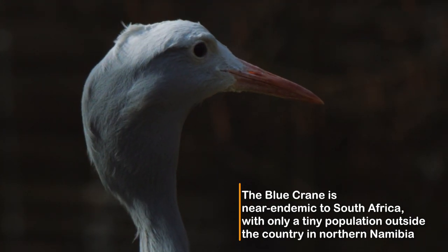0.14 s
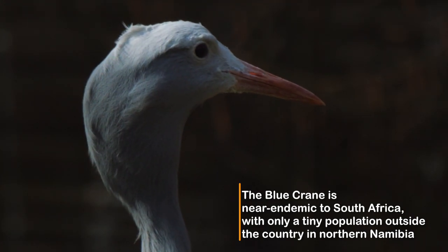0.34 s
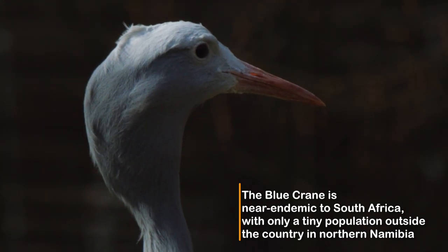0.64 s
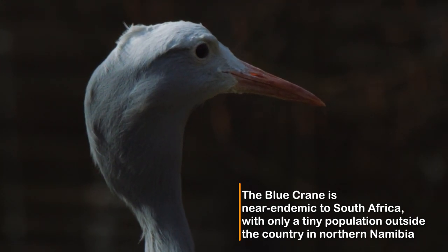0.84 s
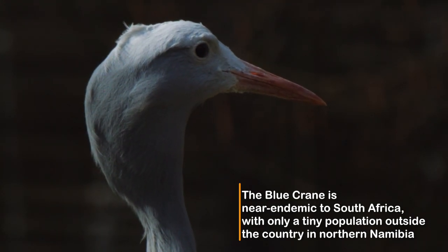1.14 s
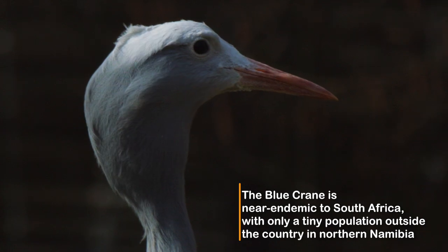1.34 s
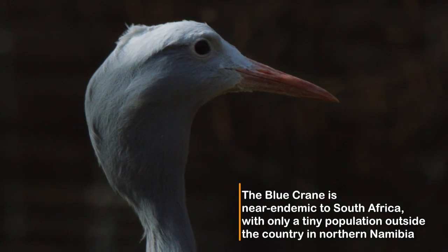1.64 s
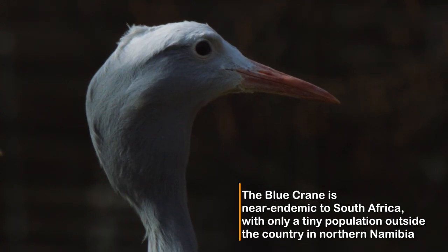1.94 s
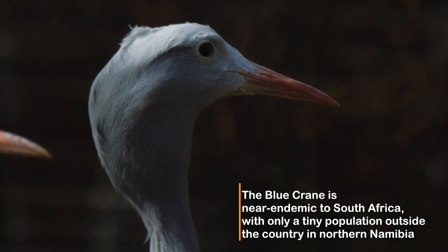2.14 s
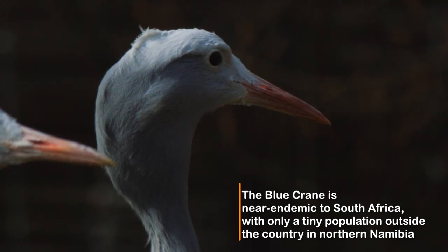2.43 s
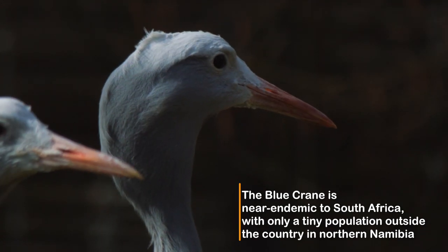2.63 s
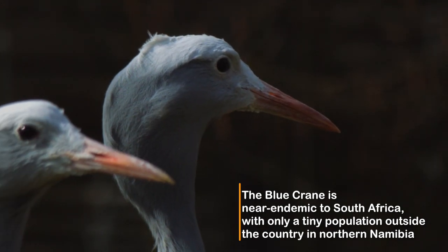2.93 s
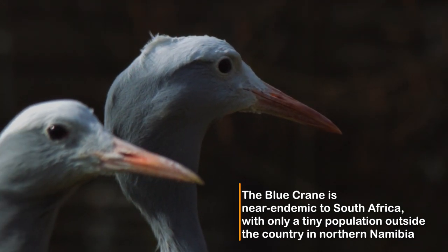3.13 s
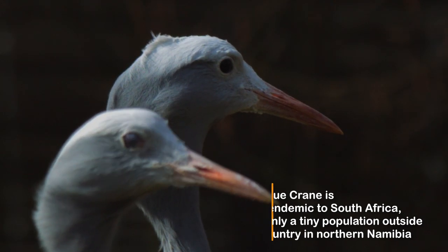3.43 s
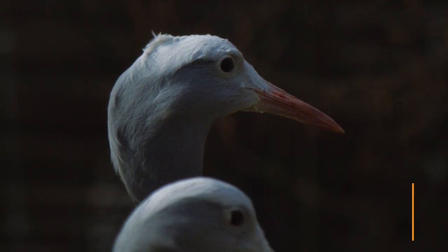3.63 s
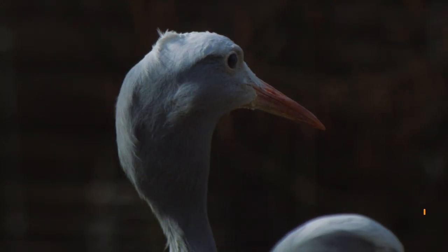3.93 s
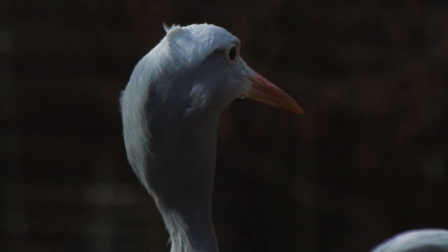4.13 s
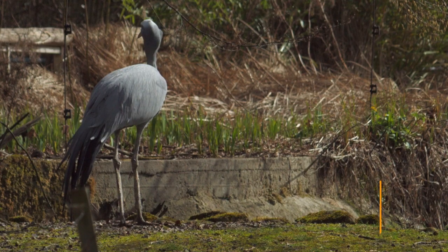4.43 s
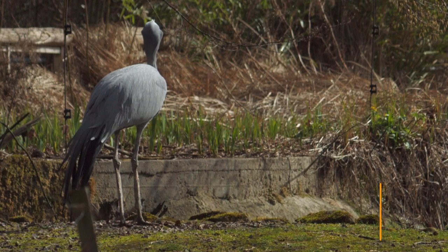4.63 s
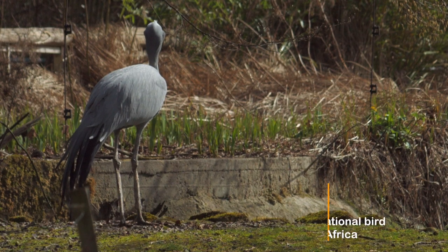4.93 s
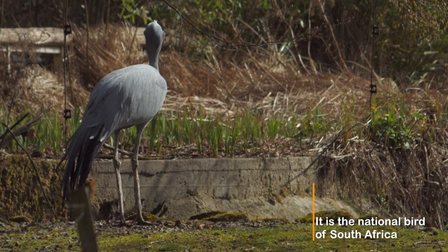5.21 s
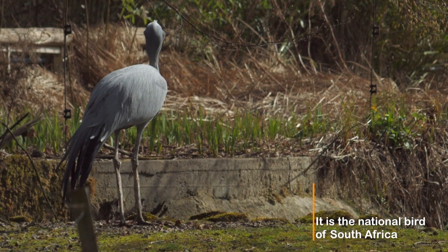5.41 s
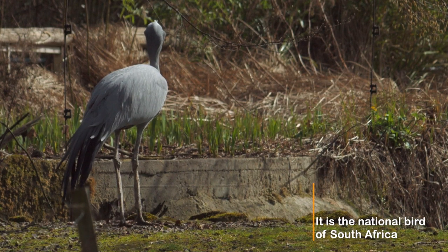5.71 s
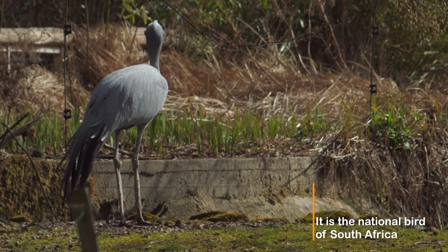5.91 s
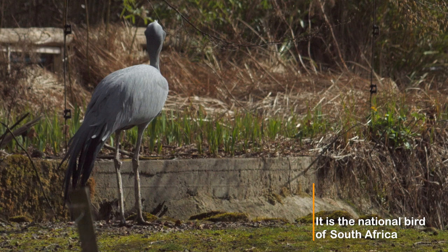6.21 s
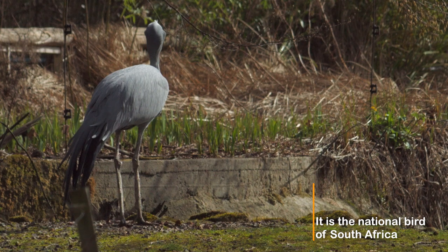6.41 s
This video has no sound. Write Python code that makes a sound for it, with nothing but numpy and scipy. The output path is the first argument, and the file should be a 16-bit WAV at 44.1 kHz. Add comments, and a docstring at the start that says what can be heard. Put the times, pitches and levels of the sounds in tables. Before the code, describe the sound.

Two cranes trade runs of harsh, rattling croaks after a songbird's high notes and quick trill, over faint air and distant chirps.

```python
"""Outdoors, near trees and walls, two blue cranes croak in overlapping runs that swell, hurry and fade.
Each croak is up to three bursts of about five sharp syrinx pulses ringing in the windpipe.
Before them a small songbird whistles three falling notes and trills, in nearly pure gliding tones.
Farther birds sing among the trees, something knocks once on wood, and the air rushes faintly."""
import sys
import numpy as np
from scipy import signal
from scipy.fft import rfft, irfft, next_fast_len
from scipy.io import wavfile
from scipy.ndimage import uniform_filter1d, map_coordinates

SR = 44100
rng = np.random.default_rng(int(sys.argv[2]) if len(sys.argv) > 2 else 0)


def log_audio(samples):
    """Write samples as a 16-bit WAV file to the path given in sys.argv[1]."""
    # one column per channel
    frames = np.atleast_2d(samples).T
    # limit to full scale, then quantise
    limited = np.clip(frames, -1, 1)
    pcm = np.round(limited * 32767).astype(np.int16)
    wavfile.write(sys.argv[1], SR, pcm)


N = 289296

# Levels in the tables are relative, ahead of the mix.
# tone of the air bed: freq_hz, level_db
AIR_SPECTRUM = [(25, -7), (70, -2), (380, 0.5), (800, -2.5), (1500, -6.5), (3300, -8.5), (5100, -5),
                (6500, -11.5), (10000, -15), (15000, -18)]
# stereo image of the air bed: freq_hz, left_right_correlation
AIR_LIKENESS = [(200, -0.7), (500, -0.48), (1500, -0.25), (5000, 0.76), (12000, 0.056)]
# tails from the trees, the nearby walls and the ground at the birds' feet: freq_hz, t60_s
TREE_DECAY = [(500, 1), (4000, 0.27), (10000, 0.64)]
WALL_DECAY = [(500, 0.2), (2000, 0.15), (10000, 0.16)]
GROUND_DECAY = [(800, 0.036), (3000, .025), (8000, 0.0093)]
# distant birds' slurs: start_s, length_s, start_hz, middle_hz, end_hz, level_db
FAR_SLURS = [ (0, .1, 5400, 4190, 3000, -60), (.18, 0.08, 3300, 4280, 3950, -57.5),
             (.245, 0.057, 3900, 4910, 5500, -64), (.17, .12, 2850, 2800, 2850, -71),
             (0.349, .16, 3400, 3570, 2900, -61), (.465, 0.033, 4500, 4770, 4550, -69),
             (.5, .05, 2650, 3300, 3900, -71), (0.562, .14, 3000, 3090, 3900, -61),
             (.62, 0.092, 3950, 3810, 4400, -59.5), (0.667, .04, 4500, 4850, 4500, -67),
             (0.358, 0.28, 7250, 7150, 7050, -80), (0.551, 0.1, 8500, 7470, 6800, -73),
             (.77, 0.065, 7250, 7070, 6500, -65.5), (0.779, 0.19, 2735, 2600, 2760, -66.5),
             (0.799, 0.071, 2700, 3520, 2900, -62.5), (0.923, 0.072, 2700, 3480, 2870, -65.5),
             (1.204, 0.09, 2030, 2100, 2030, -61), (1.359, .14, 2080, 2160, 2070, -65.5),
             (1.598, 0.31, 2100, 2130, 2030, -72), (1.062, 0.065, 2900, 3340, 2790, -67),
             (2.02, .1, 2400, 3100, 3250, -67), (2.12, 0.072, 3900, 3100, 2390, -65.5),
             (3.476, 0.091, 5750, 5745, 5760, -64), (3.558, 0.26, 5761, 5780, 5700, -74.5),
             (5.28, 0.066, 6200, 5700, 4900, -68), (5.377, 0.049, 5500, 5320, 5000, -62.5),
             (6.214, 0.13, 5400, 5840, 5800, -62.5), (6.343, 0.035, 5100, 4400, 3860, -62.5),
             (6.408, 0.097, 5250, 5890, 5550, -57), (6.502, .035, 4800, 4500, 4400, -68),
             (6.535, .028, 3000, 3650, 4300, -68)]
# ring of the knocked wood: freq_hz, level_db, t60_s
WOOD_MODES = [(673, -53.5, 0.088), (1430, -48, 0.0051)]
# the songbird's opening whistles: start_s, length_s, scoop_hz, top_hz, middle_hz, end_hz, level_db
OPENING_NOTES = [(0.907, 0.12, 8700, 8950, 8650, 8000, -46.5), (1.119, 0.11, 5050, 7020, 6580, 6390, -38),
                 (1.322, 0.047, 4870, 6970, 6580, 5310, -36.5)]
# upward flicks that launch the louder whistles: start_s, level_db
FLICK_CUES = [(1.098, -41), (1.302, -43.5)]
# contour of one flick: offset_s, pitch_hz, level_db
FLICK_SHAPE = [(0, 3830, -21), (.007, 6470, 1.5), (.014, 7800, -19), (.023, 8200, -16)]
# the trill's syllables, slowing a little: start_s, length_s, level_db
TRILL_CUES = [(1.4098, 0.038, -32), (1.4815, 0.036, -31), (1.5508, 0.037, -31), (1.6233, 0.035, -31.5),
              (1.691, 0.035, -32), (1.7622, 0.034, -31.3), (1.8337, 0.0349, -30.5), (1.9077, 0.035, -31.1),
              (1.981, 0.037, -31), (2.0546, 0.038, -32.5), (2.1365, 0.034, -31), (2.2145, 0.036, -33.5),
              (2.2993, 0.0328, -31.5), (2.378, 0.035, -30.5), (2.4568, 0.0349, -31.5), (2.5328, 0.038, -31),
              (2.612, 0.039, -31.5), (2.6908, 0.037, -31), (2.7655, 0.038, -30), (2.8436, 0.038, -32),
              (2.926, 0.035, -31.5), (3.0076, 0.036, -32.5)]
# contour of one syllable: length_share, pitch_fall_share, level_db
SYLLABLE_SHAPE = [(0, .08, -19), (0.098, .17, -15), (0.252, 0.4, -9), (0.452, 0.652, -4),
                  (0.651, 0.78, -1.6), (.8, 0.908, -1.1), (0.903, 1.042, -0.7), (1, 1.2, -5),
                  (1.083, 1.45, -19.5), (1.204, 2.3, -24.5)]
# resonances of each crane's windpipe and bill: freq_hz, gain_db
LOW_WINDPIPE = [(350, -62), (540, -10), (680, 2), (880, 2.5), (1080, 0), (1330, -6), (1750, 3.5),
                (2350, -6.5), (3100, 3), (4250, -9.5), (5000, -2.5), (7000, -15), (9500, -24.5),
                (11000, -31.5), (15500, -43.5)]
HIGH_WINDPIPE = [(400, -56.5), (620, -5), (820, -1.5), (1050, 3), (1220, 1.5), (1480, -6), (1950, -1),
                 (2450, -9), (3400, -5), (4300, -12), (5500, -6.5), (6700, -14), (7500, -22), (10000, -26),
                 (15500, -39)]
# brightness as each bill opens and turns: time_s, tilt_db_per_octave
LOW_BILL_TILT = [(3, -2), (3.2, -1.5), (3.9, 2), (4.2, 1), (4.76, 0.6), (5.1, 3), (5.8, 3)]
HIGH_BILL_TILT = [(3.5, 0.4), (4.2, -3.5), (4.55, -4.5), (5.5, 3), (5.85, 2)]
# each crane's runs: start_s, croak_count, first_gap_s, third_gap_s, last_gap_s,
# first_db, full_db, last_db, swell_croaks, top_pulse_hz, air_spent_share
LOW_CROAK_RUNS = [ (2.879, 11, 0.0575, .0595, 0.0415, -63, -42, -54, 1.1, 881, 0.89),
                  (3.8485, 9, 0.06, 0.06, 0.041, -43.5, -38.5, -45.5, 0.44, 935, 1.07),
                  (4.7573, 10, .06, .0575, .0405, -43.5, -36, -51.5, 0.99, 996, 1.12),
                  (5.726, 10, .058, 0.057, .041, -43.5, -36, -41.5, 0.73, 1003, 1.03)]
HIGH_CROAK_RUNS = [ (3.105, 10, 0.058, .059, .046, -46, -43, -49.5, 0.5, 1082, .8),
                   (4.1115, 10, .055, .0564, .0448, -44.5, -41, -50, .75, 1110, .95),
                   (5.397, 10, .052, .0586, .047, -59.5, -41, -41, 0.97, 1140, .75)]
# the pulse rate arches over every run: run_share, top_rate_share
PULSE_ARCH = [(0, 0.757), (.12, 0.912), (.3, 1), (.55, .97), (.85, 0.932), (1, 0.755)]
# croaks lose their later bursts as the air runs out: air_spent_share, second_burst_db, third_burst_db
BURST_FADE = [(0, -0.5, 0), (.35, -2, -1), (0.448, -1.5, -4), (.57, -0.5, -22), (.8, -7.5, -36),
              (1, -12, -40)]
# the cranes' stereo balance: freq_hz, left_minus_right_db
CRANE_BALANCE = [(700, 1.5), (1400, 1), (2800, -1.7), (5000, 1)]
# the cranes' stereo phase: freq_hz, left_lead_rad
CRANE_LEFT_LEAD = [(800, -0.25), (3000, 0.53), (5000, 0.9), (8000, 1)]


def amp(db):
    """Decibels to gain."""
    return 10 ** (np.asarray(db) / 20)


def rms(z):
    """Rms magnitude of a signal or spectrum."""
    return np.sqrt(np.mean(np.abs(z) ** 2) + 1e-20)


def along(points, hz):
    """Reads a curve of (Hz, value) points on a log frequency axis."""
    freqs, values = np.transpose(points)
    return np.interp(np.log(hz + 1), np.log(freqs + 1), values)


def add(track, start_s, sound):
    """Mixes a sound into a track from start_s on."""
    start = max(round(start_s * SR), 0)
    part = track[start:start + len(sound)]
    part += sound[:len(part)]


def wobble(rate_hz, size):
    """A smooth random curve with rate_hz knots a second."""
    knots = rng.standard_normal(int(size * rate_hz / SR) + 4)
    return map_coordinates(knots, [np.arange(size) * rate_hz / SR])


def filtered(x, response):
    """Equalises x with a response given as a function of frequency."""
    size = next_fast_len(N + SR // 2)
    return irfft(rfft(x, size) * response(np.fft.rfftfreq(size, 1 / SR)), size)[..., :N]


def causal(gain):
    """The minimum-phase response with this gain: it rings only after it is struck."""
    cepstrum = irfft(np.log(np.maximum(gain, 1e-6)))
    half = len(cepstrum) // 2
    return np.exp(rfft(np.r_[cepstrum[0], 2 * cepstrum[1:half], np.zeros(half)]))


def echoes(x, decay, delay_s, paths=5, size=SR // 2):
    """Stereo reverb with a decay per frequency; crossfaded random tails keep it smooth and uncoloured."""
    out = np.zeros((2, N))
    knots = np.linspace(0, N, paths)
    spacing = knots[1]
    for knot in knots:
        hz, t, noise = signal.stft(rng.standard_normal((2, size)), SR, nperseg=256)
        tails = signal.istft(noise * amp(-60 * t / along(decay, hz)[:, None]), SR, nperseg=256)[1]
        span = np.arange(max(int(knot - spacing), 0), min(int(knot + spacing), N))
        send = x[span] * np.cos(np.pi / 2 * (span - knot) / spacing)
        for side, tail in zip(out, tails):
            add(side, span[0] / SR + delay_s, signal.fftconvolve(send, tail / np.linalg.norm(tail)))
    return out


def whistle(points, waver, flutter_db, overtone_db, waver_rate_hz=350):
    """A nearly pure tone gliding through (time_s, pitch_hz, level_db) points."""
    times, hz, db = np.transpose(points)
    t = np.arange(times[0], max(times[-1], times[0] + .005), 1 / SR)
    glide = uniform_filter1d(np.interp(t, times, hz), size=130)
    pitch = glide * (1 + waver * wobble(waver_rate_hz, len(t)))
    phase = 2 * np.pi * np.cumsum(pitch) / SR
    level = amp(np.interp(t, times, db) + flutter_db * wobble(160, len(t)))
    fades = np.clip(np.minimum(t - t[0], t[-1] - t) / .001, 0, 1)
    return level * fades * (np.sin(phase) + amp(overtone_db) * np.sin(2 * phase))


def air(level_db=-69.0, drift_db=0.26):
    """A faint bed of outdoor rush, wide in the bass."""
    def mid_side_tone(hz):
        width = np.tan(np.arccos(np.clip(along(AIR_LIKENESS, hz), -1, 1)) / 2)
        return amp(along(AIR_SPECTRUM, hz)) * np.array([np.ones_like(hz), width])

    mid, side = filtered(rng.standard_normal((2, N)), mid_side_tone)
    level = amp(level_db + drift_db * wobble(3.07, N))
    return level * np.array([mid + side, mid - side]) / np.std(mid)


def warblers(start_s, span_s, count, level_db, fade_db, low_hz, high_hz):
    """A loose, far-off chorus of short arched chirps that sinks by fade_db over its span."""
    out = np.zeros(N)
    for k, (when, height, bend, length) in enumerate(rng.random((count, 4))):
        progress = (k + when) / count
        times = start_s + span_s * progress + (0.051 + 0.057 * length) * np.array([0, .5, 1])
        hz = low_hz * (high_hz / low_hz) ** height * np.array([.85 + 0.27 * bend, 1, .85])
        db = level_db - fade_db * progress - np.array([8, 0, 8])
        add(out, times[0], whistle(np.c_[times, hz, db], waver=0.026, flutter_db=2.5, overtone_db=-37.5))
    return out


def deep_wood_birds():
    """Birds so far away that only their echo among the trees arrives."""
    steady = warblers(0, span_s=6.3, count=48, level_db=-73.5, fade_db=0, low_hz=4260, high_hz=5630)
    thin = warblers(4.18, span_s=.36, count=12, level_db=-69.5, fade_db=2, low_hz=4560, high_hz=7800)
    late = warblers(6.13, span_s=.33, count=10, level_db=-67, fade_db=2.5, low_hz=2850, high_hz=5360)
    mid, side = echoes(steady + thin + late, TREE_DECAY, delay_s=.01)
    return mid + np.array([[1], [-1]]) * amp(-11) * side  # mostly from straight ahead


def far_birds(swell_db=9, waver_hz=69.3):
    """Faint slurred notes from among the trees, and a run of soft down-slurs that sinks in pitch."""
    notes = [[(s, start_hz, db - swell_db), (s + length / 2, middle_hz, db),
              (s + length, end_hz, db - swell_db)]
             for s, length, start_hz, middle_hz, end_hz, db in FAR_SLURS]
    sinking_run = [[(s, hz, -67), (s + 0.0089, .96 * hz, -61), (s + 0.045, 0.85 * hz, -65)]
                   for s, hz in zip(np.linspace(.895, 1.9, 12), 4700 + 1700 * 0.85 ** np.arange(12))]
    out = np.zeros(N)
    for note in notes + sinking_run:
        start_s, middle_hz = note[0][0], note[1][1]
        tone = whistle(note, waver_hz / middle_hz, flutter_db=3.0, overtone_db=-50, waver_rate_hz=170)
        add(out, start_s, tone)
    return out


def knock(start_s=.5305, thud_db=-59, thud_t60_s=0.14):
    """One light, dull knock on wood: two brief modes over a low, noisy thud."""
    out, t = np.zeros(N), np.arange(SR // 5) / SR
    ring = sum(amp(db - 60 * t / t60) * np.sin(2 * np.pi * hz * t) for hz, db, t60 in WOOD_MODES)
    band = signal.butter(2, [WOOD_MODES[0][0] / 2, WOOD_MODES[1][0]], "band", fs=SR, output="sos")
    thud = signal.sosfilt(band, rng.standard_normal(len(t)))
    add(out, start_s, ring + amp(thud_db - 60 * t / thud_t60_s) * thud / rms(thud))
    return out


def songbird_notes(scoop_s=.015, drop_s=.011, drop_ratio=0.91):
    """Three whistles that scoop up, swell as they slide down and drop off; flicks launch the last two."""
    out = np.zeros(N)
    for s, length, scoop_hz, top_hz, middle_hz, end_hz, db in OPENING_NOTES:
        note = [(s - scoop_s, scoop_hz, db - 12), (s, top_hz, db - 11),
                (s + length / 2, middle_hz, db - 2), (s + length, end_hz, db),
                (s + length + drop_s, drop_ratio * end_hz, db - 15)]
        add(out, s - scoop_s, whistle(note, waver=0.0026, flutter_db=1.5, overtone_db=-46))
    for s, db in FLICK_CUES:
        flick = np.array(FLICK_SHAPE) + [s, 0, db]
        add(out, s, whistle(flick, waver=0.0038, flutter_db=0.5, overtone_db=-42))
    return out


def songbird_trill(first_hz=5820, last_hz=5580, fall_to_hz=5050, bend_hz=36):
    """One down-slurred syllable repeated, its starting pitch easing down through the trill."""
    out = np.zeros(N)
    share, fall, shape_db = np.transpose(SYLLABLE_SHAPE)
    for (s, length, db), top_hz in zip(TRILL_CUES, np.linspace(first_hz, last_hz, len(TRILL_CUES))):
        bend = bend_hz * rng.standard_normal(len(share))  # no two syllables bend alike
        note = np.c_[s + length * share, top_hz + (fall_to_hz - top_hz) * fall + bend, db + shape_db]
        add(out, s, whistle(note, waver=0.0045, flutter_db=0.6, overtone_db=-47.5))
    return out


def croaks(runs, fade_croaks=0.58):
    """Runs swell, arch in pitch, hurry and fade; yields (start_s, bursts_db, pulse_hz) per croak."""
    share, second_db, third_db = np.transpose(BURST_FADE)
    for start_s, count, *gaps_s, first_db, full_db, last_db, swell_croaks, top_hz, air_spent in runs:
        k = np.arange(round(count))
        gaps = np.interp(k[:-1], [0, 2, k[-2]], gaps_s)
        times = start_s + np.r_[0, np.cumsum(gaps)]
        swell_db = (first_db - full_db) * np.exp(-k / swell_croaks)
        fade_db = (last_db - full_db) * np.exp(-k[::-1] / fade_croaks)
        db = full_db + swell_db + fade_db
        progress = k / k[-1]
        spent = progress * air_spent
        bursts_db = np.c_[db, db + np.interp(spent, share, second_db),
                          db + np.interp(spent, share, third_db)]
        yield from zip(times, bursts_db, top_hz * np.interp(progress, *np.transpose(PULSE_ARCH)))


def crane(runs, bill, windpipe, usual_db, rest_hz, relax, burst_gap_s, rise_s, fall_s,
          jitter_cycles, scatter_db, rasp, sag, stretch, bite=0.17, usual_pulse_hz=920):
    """The syrinx opens in short bursts; in each it slaps shut a few times and rings the windpipe."""
    size, lead_s = 4096, .01
    uneven_db, uneven_rate, uneven_pipe = 0.92, 0.016, 0.0096  # no two bursts are alike
    out, t, hz = np.zeros(N), np.arange(size) / SR - lead_s, np.fft.rfftfreq(size, 1 / SR)
    body = (hz > 600) & (hz < 3900)  # this band sets a burst's level
    slaps = np.arange(-4, 5)
    octaves = np.log2(np.clip(hz / 1000, 1, 8))
    swell = lambda dt: np.exp(-np.abs(dt / np.where(dt < 0, rise_s, fall_s)) ** 3)
    for start_s, bursts_db, pulse_hz in croaks(runs):
        for k, db in enumerate(bursts_db + uneven_db * rng.standard_normal(len(bursts_db))):
            # a wider bill lets out more treble, and a harder burst slaps more sharply
            tilt = np.interp(start_s, *np.transpose(bill)) + bite * (db - usual_db)
            # the windpipe's resonances rise with effort
            shift = (pulse_hz / usual_pulse_hz) ** stretch * (1 + uneven_pipe * rng.standard_normal())
            pipe = causal(amp(along(windpipe, hz / shift) + tilt * octaves))
            # after the first burst the pulse rate relaxes towards rest
            rate_hz = pulse_hz + relax * (rest_hz - pulse_hz) * (k > 0)
            rate_hz *= 1 + uneven_rate * rng.standard_normal()
            cycles = slaps + rng.uniform(-0.479, 0.483) + jitter_cycles * rng.standard_normal(len(slaps))
            # the slaps slow down as the burst's pressure is spent
            slap_s = (cycles + sag * cycles ** 2) / rate_hz
            force = swell(slap_s) * amp(scatter_db * rng.standard_normal(len(slaps)))
            pulses = force @ np.exp(-2j * np.pi * np.outer(slap_s + lead_s + k * burst_gap_s, hz))
            hiss = rfft(swell(t - k * burst_gap_s) * rng.standard_normal(size))
            burst = pipe * (pulses / rms(pulses) + rasp * hiss / rms(hiss))
            add(out, start_s - lead_s, amp(db) * irfft(burst) / rms(burst[body]))
    return out


def crane_position(hz):
    """Small left-right offsets of level and phase place the cranes nearly straight ahead."""
    sides = np.array([[.5], [-.5]])
    return amp(sides * along(CRANE_BALANCE, hz)) * np.exp(1j * sides * along(CRANE_LEFT_LEAD, hz))


def scene():
    """Cranes up front, the songbird behind them, other birds far off, one knock and a bed of air."""
    low = crane(LOW_CROAK_RUNS, LOW_BILL_TILT, LOW_WINDPIPE, usual_db=-34.5, rest_hz=808, relax=0.55,
                burst_gap_s=.0102, rise_s=0.0028, fall_s=0.0031,
                jitter_cycles=0.057, scatter_db=2.1, rasp=0.33, sag=0.023, stretch=.08)
    high = crane(HIGH_CROAK_RUNS, HIGH_BILL_TILT, HIGH_WINDPIPE, usual_db=-39.0, rest_hz=737, relax=0.22,
                 burst_gap_s=.0101, rise_s=0.0024, fall_s=0.0029,
                 jitter_cycles=0.059, scatter_db=1.0, rasp=0.14, sag=0.014, stretch=0.023)
    cranes = amp(31.5) * (low + high)
    song = songbird_notes() + songbird_trill()
    far = far_birds()
    far += warblers(0, span_s=2.2, count=44, level_db=-73.5, fade_db=3, low_hz=2406, high_hz=4600)
    # the ground's scatter comes from the same direction as the birds
    cranes += amp(-6.0) * echoes(cranes, GROUND_DECAY, delay_s=0.001518, paths=48, size=2048)[0]
    foreground = (filtered(cranes, crane_position)
                  + amp(-11.0) * echoes(cranes, WALL_DECAY, delay_s=.003, paths=16, size=6144)
                  + amp(-31.0) * echoes(cranes, TREE_DECAY, delay_s=0.028))
    midground = (song + amp(-20.5) * echoes(song, TREE_DECAY, delay_s=0.0077)
                 + amp(-29.0) * echoes(song, WALL_DECAY, delay_s=0.0022, paths=16, size=6144))
    background = (amp(-1.5) * far + amp(-6.5) * echoes(far, TREE_DECAY, delay_s=.006)
                  + amp(-6.5) * echoes(far, GROUND_DECAY, delay_s=.002, paths=24, size=2048)[0]
                  + deep_wood_birds())
    return foreground + midground + background + knock() + air()


def record(dry):
    """A brick-wall low-pass at 15.7 kHz trims the very top."""
    return filtered(dry, lambda hz: hz < 15700)


dry = scene()
out = record(dry)
log_audio(out)
```